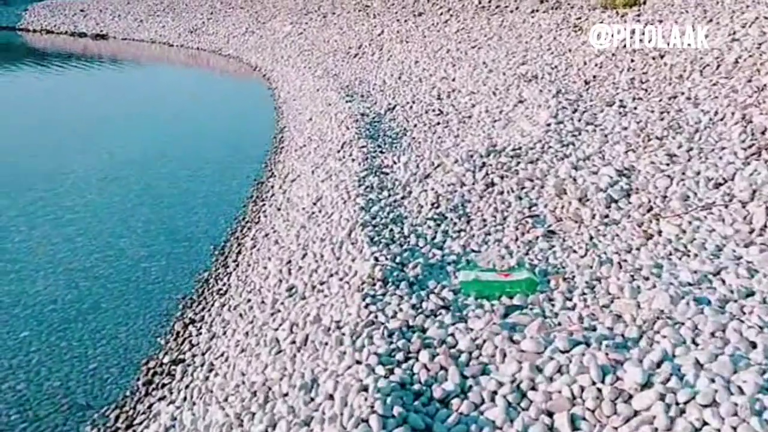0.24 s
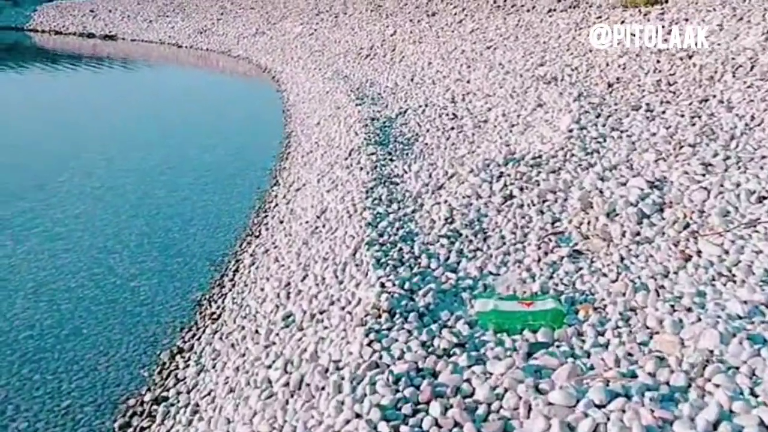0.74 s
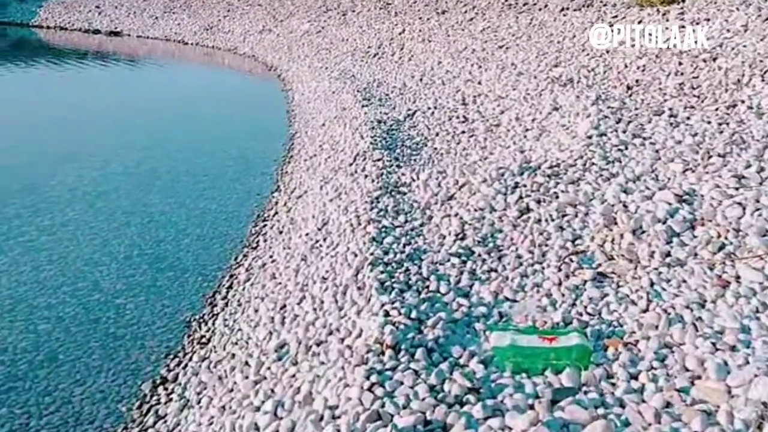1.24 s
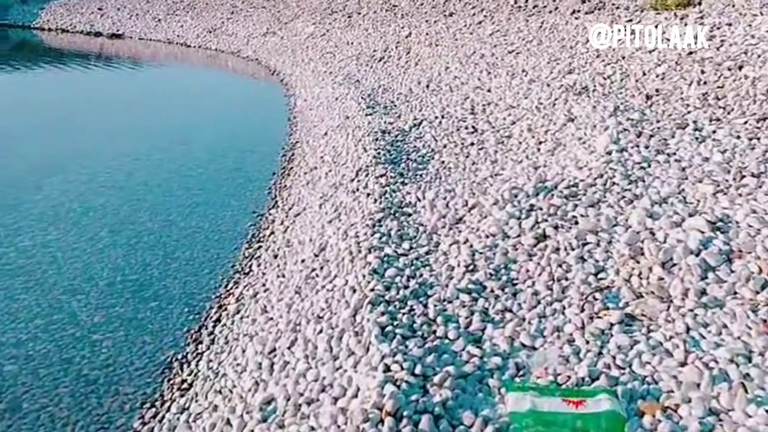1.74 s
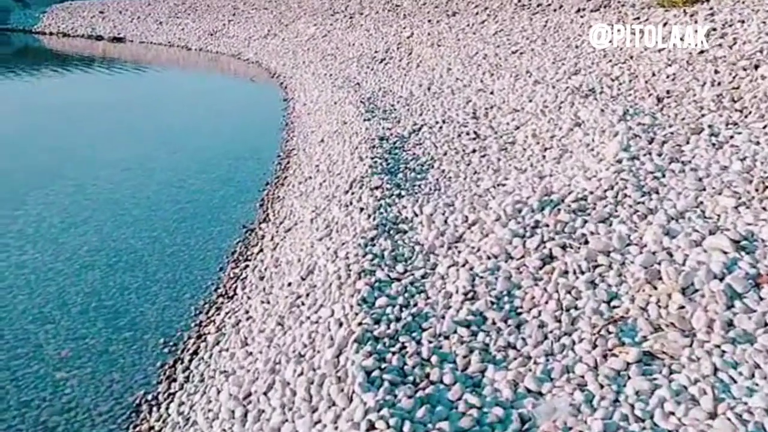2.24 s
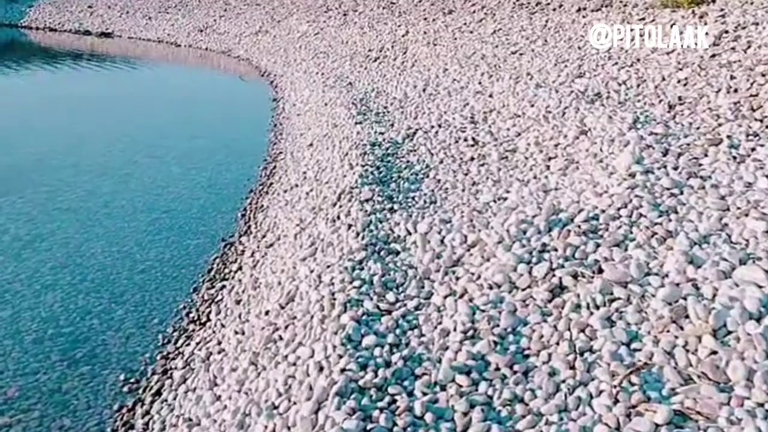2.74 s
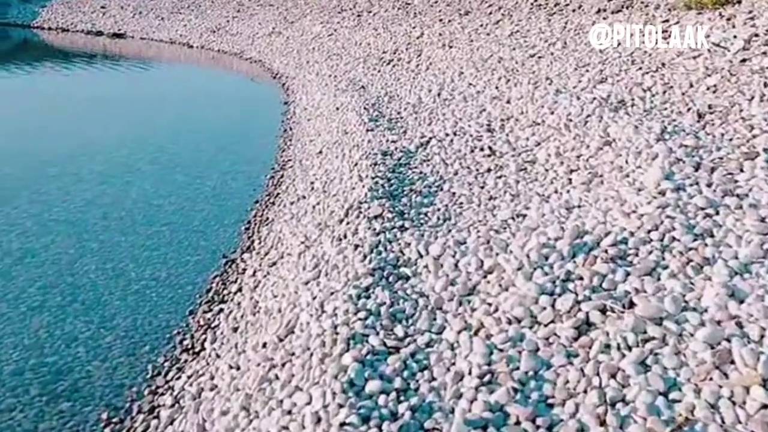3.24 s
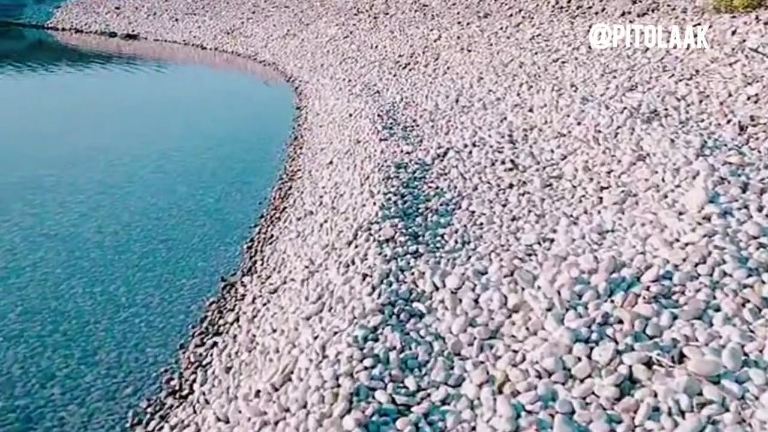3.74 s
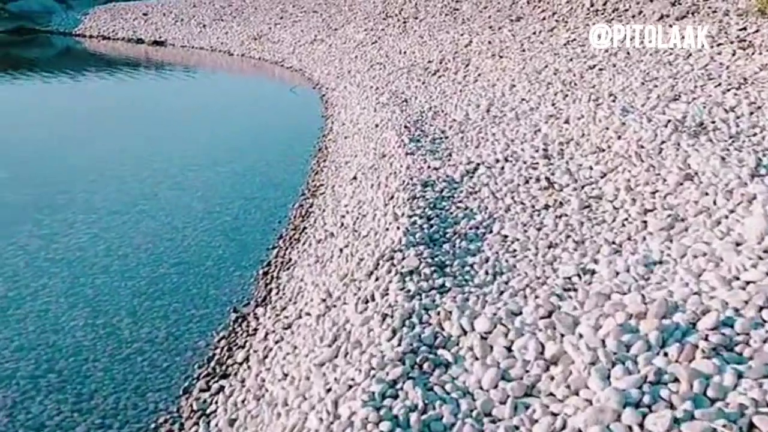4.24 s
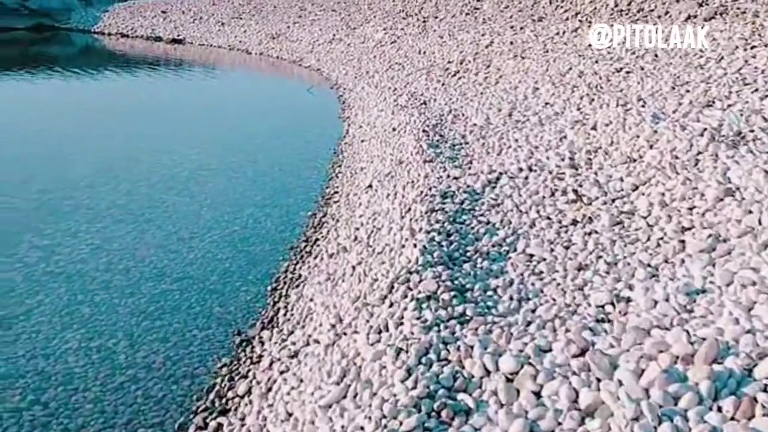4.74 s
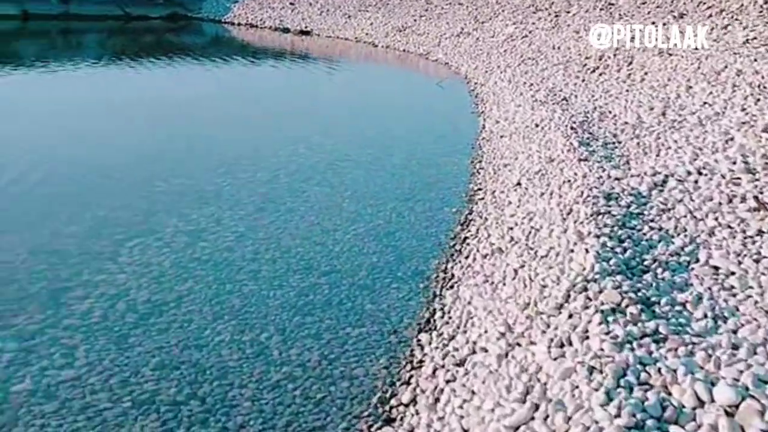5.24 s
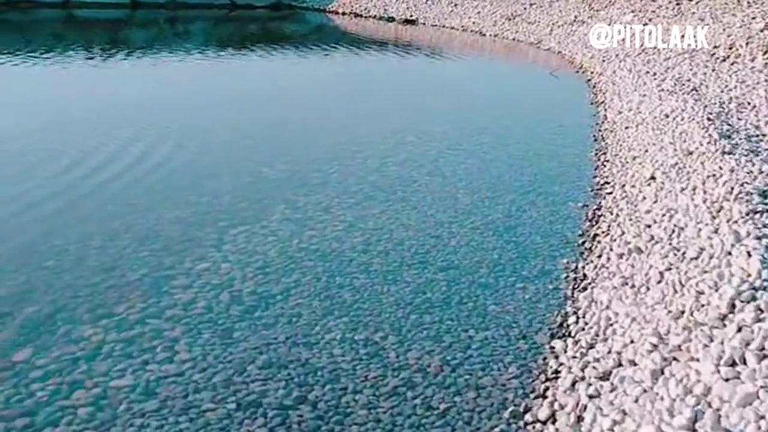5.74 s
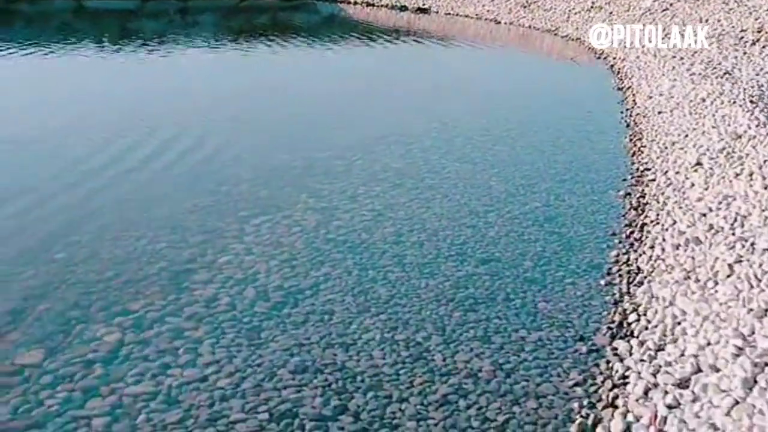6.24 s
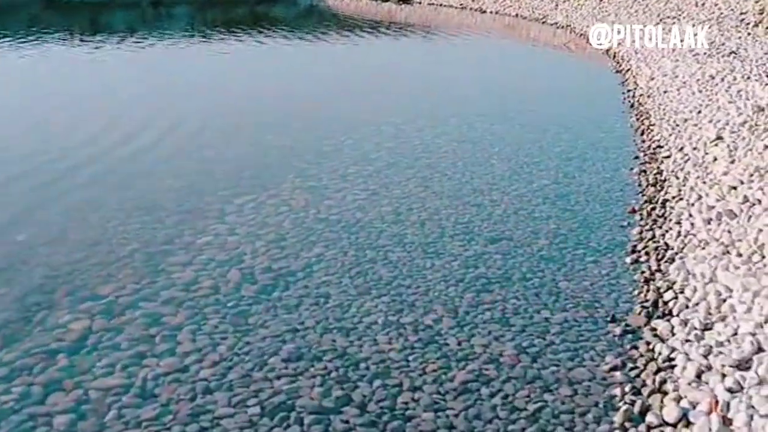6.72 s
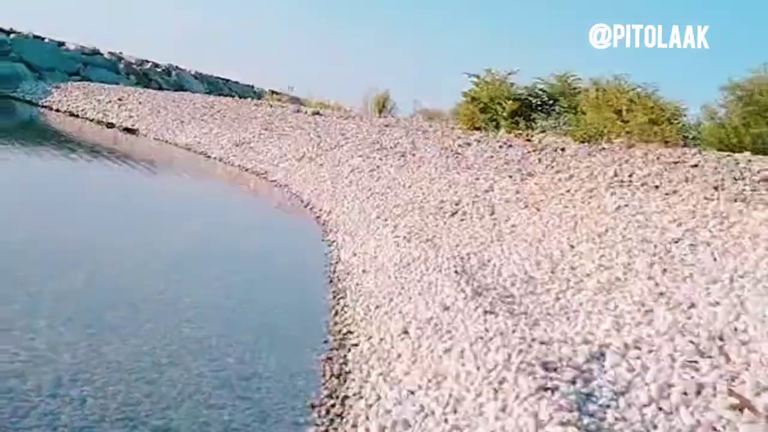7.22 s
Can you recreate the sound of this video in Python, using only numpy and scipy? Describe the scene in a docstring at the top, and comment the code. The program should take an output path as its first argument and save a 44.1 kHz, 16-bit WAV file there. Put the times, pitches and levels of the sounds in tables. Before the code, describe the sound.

Steps press into a deep bed of smooth stones on an open lake shore, heard near the walker's feet. Each brings a low grind, granular crunch and trickling pebbles, with sudden slips and hard single clacks. Dull knocks and brief squeaks appear occasionally. Behind are quiet air, a soft uneven rumble, thin hiss and a short distant bird trill; the final seconds are the clinkiest.

```python
"""A foot crunches into loose rounded pebbles on a lake shore, and a walk along the bed follows.
Steps and slides are showers of random stone contacts over rubbing noise; single pebbles clack as short
coloured rings, and damped sines knock. Cloth swishes as shaped noise; soles squeak as gliding tones.
Behind lie quiet air, a soft low rumble and a thin high hiss, all coloured noise, and a far bird whose
fast trill is a row of tiny falling whistles."""
import sys
import numpy as np
from scipy import signal
from scipy.fft import rfft, irfft, next_fast_len
from scipy.io import wavfile
from scipy.ndimage import uniform_filter1d, minimum_filter1d, map_coordinates

SR = 44100
rng = np.random.default_rng(int(sys.argv[2]) if len(sys.argv) > 2 else 0)


def wav_record(signal):
    """Record a signal, one row per channel, as 16-bit PCM in the file named by sys.argv[1]."""
    frames = np.transpose(np.atleast_2d(signal))
    bounded = np.clip(frames, -1, 1)
    # unit amplitude maps onto the largest positive 16-bit level
    quanta = np.round(bounded * 32767).astype(np.int16)
    wavfile.write(sys.argv[1], SR, quanta)


N = 329868

# Presses of a foot on the bed; a rise or fade time is the time for 20 dB, levels precede the layer gains:
# (full weight [s], rise [s], hold [s], fade [s], deep grinding [dB], crunch [dB], bright chinking [dB],
#  settling relative to the press [dB])
FOOT_PRESSES = [(0.0, .05, 0.071, 0.088, -41, -35, -44, -31),
                (0.288, 0.066, 0.1, .1, -47.5, -44.5, -58, -17),
                (0.572, 0.1, 0.11, .06, -37.5, -31.5, -41.5, -9.5),
                (1.246, 0.092, 0.13, 0.05, -33.5, -27, -36, -15),
                (1.485, 0.19, 0.047, 0.39, -43, -40.5, -56, -7), (1.885, 0.1, .12, .18, -29, -25, -34, -14),
                (2.486, 0.13, 0.15, .13, -31, -26, -36, -13),
                (2.925, 0.12, 0.083, .04, -39, -38.5, -48, -3),
                (3.235, 0.05, 0.027, 0.24, -30.5, -25.5, -32.5, -9),
                (3.743, 0.046, .22, 0.088, -40, -29.5, -32.5, -18.5),
                (4.364, 0.049, 0.15, 0.16, -37, -26, -27, -19.5),
                (5.203, 0.15, 0.21, 0.089, -34, -31, -35, -11),
                (5.395, 0.05, 0.071, 0.17, -31.5, -23.5, -23.5, -19),
                (5.69, 0.1, 0.18, 0.25, -42.5, -34, -34.5, -18),
                (6.037, 0.16, .16, .04, -45.5, -40, -46.5, -13),
                (6.387, 0.075, 0.23, 0.2, -41.5, -29, -27, -20),
                (6.8, 0.028, .18, 0.16, -47.5, -29, -35.5, -9.5),
                (7.328, 0.44, 0.17, .1, -51, -47.5, -59, -16)]
# Stones giving way suddenly under the sole, levels before the layer gains:
# (time [s], hold [s], deep grinding [dB], crunch [dB], bright chinking [dB])
STONE_SLIDES = [(0.688, 0.011, -30.5, -21, -31.5), (1.24, .025, -48, -29.5, -40),
                (1.695, 0.019, -46.5, -46, -52), (2.097, 0.026, -37, -29, -50),
                (2.55, 0.05, -38, -17.5, -28), (2.686, 0.011, -40.5, -25.5, -28),
                (2.836, 0.015, -51.5, -39, -43), (2.975, 0.024, -36, -26.5, -31),
                (3.328, 0.017, -32.5, -29.5, -29.5), (3.813, 0.059, -39.5, -32, -27),
                (5.115, 0.0099, -45, -27.5, -35), (5.708, 0.012, -37, -23, -22.5),
                (5.841, .015, -35.5, -25, -21), (6.065, 0.0043, -58, -27, -24),
                (6.195, 0.0081, -48, -36, -49), (6.371, 0.037, -38.5, -22, -17),
                (6.512, 0.021, -43, -22.5, -26), (6.671, 0.042, -55, -29, -30.5),
                (6.809, 0.03, -43, -29, -20)]
# Single pebbles striking each other; level over 5 ms before a common gain, bright edge relative to body:
# (time [s], level [dB], brightness [dB])
PEBBLE_CLACKS = [(0.0026, -21, 7), (0.035, -28, 17), (0.074, -30.5, -14), (0.396, -36.5, -27),
                 (0.5512, -21.5, 7), (0.678, -17, -6), (0.8195, -34.5, -22), (0.867, -39, -10),
                 (1.039, -39.5, -3), (1.2009, -23.5, -5), (1.2526, -16, -1), (1.3301, -19, 0),
                 (1.3568, -17.5, -6), (1.3878, -16, -11), (1.504, -24.5, -5), (1.9833, -15.5, -0.5),
                 (1.999, -15.5, -16), (2.138, -30.5, 11), (2.17, -33.5, -23), (2.2694, -32, -26),
                 (2.5544, -6, -8.5), (2.57, -16, 10), (2.5999, -14.5, -8), (2.6755, -22, 8.5),
                 (2.7013, -17, 9), (2.8163, -28.5, -13), (3.0023, -21.5, 4), (3.481, -33, -21.5),
                 (3.512, -32.5, -15), (3.5768, -31.5, -22.5), (3.719, -17.5, -0.5), (3.766, -17.5, 1),
                 (3.7943, -18.5, 5), (3.821, -13, 10), (3.8287, -11, 2), (3.8522, -16, 5),
                 (3.9892, -23, 2.5), (4.062, -34.5, -18), (4.3619, -20.5, -7), (4.4002, -18, -4),
                 (4.4394, -6.5, 9), (4.4924, -15, 13), (4.6222, -28, -20), (4.715, -25.5, -10),
                 (4.789, -28, -8.5), (4.9839, -28.5, -19), (5.0143, -24.5, -2.5), (5.069, -25.5, 1),
                 (5.087, -25, -5), (5.117, -16.5, 0.5), (5.348, -21.5, 13), (5.3807, -11.5, 5),
                 (5.4164, -17, -6), (5.4322, -13, 9), (5.454, -6, 17), (5.484, -18, 12), (5.539, -12.5, 25),
                 (5.559, -16, 8.5), (5.6125, -25, 4), (5.6324, -24.5, -7), (5.6685, -13, 11),
                 (5.688, -14.5, 11), (5.7098, -11.5, 5), (5.7284, -6, 16), (5.795, -22, 2),
                 (5.846, -15, -2), (5.8712, -19, 0), (5.8949, -13, 3.5), (5.927, -26, 2), (5.9456, -21, 2),
                 (6, -24, 7), (6.0515, -13.5, 3.5), (6.0944, -13, 11), (6.126, -25.5, 10), (6.1398, -29, 1),
                 (6.1737, -36, 2), (6.1897, -16, -5), (6.202, -14.5, 1), (6.2083, -19.5, 4),
                 (6.2819, -29.5, 3), (6.2972, -20.5, -5), (6.3708, -16, -7), (6.412, -11, 7),
                 (6.495, -15, 4), (6.5195, -4, 6.5), (6.532, -12, 22), (6.561, -18, 17), (6.604, -21.5, -7),
                 (6.7227, -14.5, 3), (6.76, -14.5, 0), (6.7996, -8.5, -1), (6.8076, -9, 12),
                 (6.9432, -12.5, 3.5), (6.9696, -16.5, -6), (6.993, -15, -3.5), (7.0787, -26.5, -16),
                 (7.1075, -22.5, -8.5), (7.147, -24.5, -1.5), (7.2112, -22.5, -11), (7.3562, -32, -8.5)]
# Dull knocks of a heel or a big stone settling:
# (time [s], level [dB], pitch [Hz], 60 dB decay [s])
DULL_KNOCKS = [(2.912, -25, 520, 0.046), (3.444, -33, 113, .12), (3.49, -22, 537, 0.037),
               (3.714, -22.5, 500, 0.044), (6.794, -14.5, 180, 0.026), (6.797, -27, 90, 0.064)]
# Clothes brushing as a leg swings through; the length is the full width at 1/e:
# (middle [s], level [dB], length [s])
CLOTH_SWISHES = [(1.785, -44, .014), (1.838, -42, 0.038), (1.92, -42, 0.092), (2.063, -46, .012),
                 (2.952, -41, 0.081), (3.22, -47, 0.067), (4.5, -36, 0.082), (5.363, -35, 0.21),
                 (6.444, -59, 0.058), (6.557, -41, 0.25), (6.826, -38, 0.04)]
# Squeaks of a sole slipping on smooth stone:
# (time [s], peak level [dB], length [s], first pitch [Hz], last pitch [Hz])
SOLE_SQUEAKS = [(2.915, -33, 0.035, 1440, 1030), (2.939, -31, 0.038, 1435, 1135),
                (6.514, -17.5, 0.019, 1390, 1310), (6.551, -20, 0.0083, 1380, 1390),
                (6.555, -26, 0.029, 1515, 1340)]
# Soft low rumble, uneven in level, before RUMBLE_GAIN_DB: (time [s], level [dB])
RUMBLE_LEVEL = [(0.0, -56), (0.16, -61.5), (2.52, -52), (2.81, -62), (3.02, -45.5), (3.08, -60),
                (3.33, -49), (4.23, -64), (4.5, -55), (4.89, -66), (5.23, -47), (5.77, -63), (6.37, -50.5),
                (7.44, -56.5), (7.48, -62)]
# Thin high hiss: (time [s], level [dB])
HISS_LEVEL = [(0, -64), (.9, -60.5), (1.2, -54), (2.3, -52.5), (3.6, -56), (4.1, -66), (7.48, -80)]
# The bird's trill, mean peak level of its notes: (time [s], level [dB])
TRILL_LEVEL = [(3.439, -58), (3.56, -54), (3.61, -40.5), (3.72, -39), (4.05, -46), (4.2, -46), (4.36, -45)]

# Relative spectra of the grinding, crunch, chinking, grit, clack body, air, low rumble and hiss:
# (frequency [Hz], density [dB per Hz])
GRIND_SPECTRUM = [(30, -57), (70, -40), (140, -20.5), (200, -3.5), (310, -0.5), (430, -4.5), (700, -7),
                  (1100, -6), (2500, -101)]
CRUNCH_SPECTRUM = [(40, -72), (300, -51), (600, -6), (850, -10), (1600, 2), (2400, 1), (3100, 0.5),
                   (3900, -5.5), (4800, -12), (8000, -61)]
CHINK_SPECTRUM = [(40, -70), (2500, -27.5), (3600, -4), (4300, -2), (5000, -1.5), (6100, 2), (7800, -4.5),
                  (9300, -14), (10200, -23.5), (15500, -38)]
GRIT_SPECTRUM = [(4000, -20), (8000, 5), (10000, -5.5), (15500, -12.5)]
BODY_SPECTRUM = [(25, -62), (100, -22.5), (250, -7), (500, -8.5), (900, -6.5), (1600, -5), (3000, 4.5),
                 (3900, -4), (4800, -15.5), (8000, -66)]
AIR_SPECTRUM = [(25, -25), (70, -3), (130, -14), (300, 5), (1000, -1.5), (2000, -10), (4000, -48),
                (8000, -25), (16000, -31)]
RUMBLE_SPECTRUM = [(20, -26), (45, -20), (90, 2), (130, 1), (220, -7.5), (500, -38)]
HISS_SPECTRUM = [(2500, -20), (4000, -4.5), (4700, -1), (5300, -2.5), (6000, -0.5), (6800, -6.5), (7800, 1),
                 (9200, -7.5), (10500, -19), (15500, -18)]

# Ring of the gaps between the stones: (frequency [Hz], 60 dB decay [s])
GAP_DECAY = [(250, 0.027), (1000, 0.025), (3000, 0.042), (6000, 0.014), (12000, 0.021)]
# Ring of pebbles lying on top: (frequency [Hz], 60 dB decay [s])
SURFACE_DECAY = [(250, 0.044), (1000, 0.056), (3000, 0.032), (6000, 0.025), (12000, 0.026)]
# Scatter from the beach around: (frequency [Hz], 60 dB decay [s])
BEACH_DECAY = [(200, 0.26), (2000, 0.099), (8000, 0.063)]
# The low part of a contact builds up later than its edge: (frequency [Hz], lag [s])
CONTACT_LAG = [(1200, 0.001091), (5000, 0.000733), (9000, 0.00034)]

SLIDE_RISE_S, SLIDE_FADE_S = 0.025, 0.038  # time for 20 dB
SETTLE_DB_PER_S = 41.5
THUD_DB = -25.5  # relative to the grinding
RUMBLE_GAIN_DB = 2
CEILING, TOP_HZ = 0.95, 15700


def footsteps(count=90):
    """Granular friction: one set of contacts grinds, crunches and chinks, with grit and a ground thud."""
    grind_db, crunch_db, chink_db = bed_levels()
    load = np.interp(grind_db, [-52, -30], [0, 1])
    hits = slips(load, count=count)
    rubbing_db = 4 * (load - 1)  # continuous rubbing strengthens with the load

    crunch = amp(0.03) * shower(crunch_db, CRUNCH_SPECTRUM, hits, count)
    crunch += amp(crunch_db + rubbing_db - 5.5) * noise(CRUNCH_SPECTRUM)
    chink = amp(-0.4) * shower(chink_db, CHINK_SPECTRUM, hits, count)
    chink += amp(chink_db + rubbing_db - 10.5) * noise(CHINK_SPECTRUM)
    grind = amp(-2.5) * shower(grind_db, GRIND_SPECTRUM, hits, count)
    grind += amp(grind_db - 2.5) * noise(GRIND_SPECTRUM)

    grit = amp(grind_db + rubbing_db - 19.5) * noise(GRIT_SPECTRUM)
    thud = amp(grind_db + THUD_DB) * noise(RUMBLE_SPECTRUM)  # the walker's weight in the ground
    return crunch + chink + grind + grit + thud


def bed_levels(size=32):
    """Power addition of independent sources: steps, settling and slides give three levels in dB."""
    t = np.arange(0, N, size) / SR
    pushes = []
    for s, hold, *levels_db in STONE_SLIDES:
        pushes.append((press(t - s, SLIDE_RISE_S, hold, SLIDE_FADE_S), levels_db))
    for s, rise, hold, fade, *levels_db, settle_db in FOOT_PRESSES:
        pressing = press(t - s, rise, hold, fade)
        settling = settle_db + press(t - s, rise, hold, 20 / SETTLE_DB_PER_S)
        pushes.append((np.maximum(pressing, settling), levels_db))
    power = sum(amp(np.add.outer(levels_db, shape)) ** 2 for shape, levels_db in pushes)
    return curves(np.column_stack([t, *(10 * np.log10(power + 1e-12))]))


def press(t, rise_s, hold_s, fade_s):
    """Exponential growth and decay: a push rises until t = 0, holds and fades, straight lines in dB."""
    return -20 * (np.maximum(-t, 0) / rise_s + np.maximum(t - hold_s, 0) / fade_s)


def slips(load, count, idle_rate=300, loaded_rate=850, spread_db=9.0):
    """Random arrivals: contacts (rates per second) crowd with load at an expected mean power near 1."""
    rate = idle_rate * (loaded_rate / idle_rate) ** load
    chance = rng.random(N)
    strength = rng.standard_normal(N)
    stone = rng.integers(count, size=N)
    at = np.flatnonzero(chance < rate / SR)
    size = unit(amp(spread_db * np.minimum(strength[at], 1.25)))
    return at, size * np.sqrt(SR / rate[at]), stone[at]


def shower(level_db, spectrum, hits, count, own_db=3):
    """Superposition of impulse responses: each (sample, size, stone) hit adds its stone's own ring."""
    at, size, stone = hits
    share = unit(amp(own_db * rng.uniform(-1.56, 1.7, N)))[at]  # every blow lands at another angle
    rings = colour(contacts(GAP_DECAY, count=count), spectrum, ripple_db=5.0, count=28)
    gains = size * share * amp(level_db[at])
    out = np.zeros(N)
    for s, gain, k in zip(at / SR, gains, stone):
        add(out, s, gain * rings[k])
    return out


def contacts(decays, count, snap=0.37, snap_s=0.00076, rise_s=0.00031):
    """Impact excitation: stone on stone snaps hard, then rings, differently for each contact."""
    ring = dying(decays, count=count, size=2048)
    t = np.arange(ring.shape[1]) / SR
    onset = 1 - np.exp(-(t / rise_s) ** 2)
    accent = 1 + snap * np.exp(-(t / (2 * snap_s)) ** 2)
    return ring * onset * accent


def dying(decays, count, size):
    """Frequency-dependent damping: rows of dense ringing lose each band at its own rate."""
    hz, t, bands = signal.stft(rng.standard_normal((count, size)), SR, nperseg=64)
    damped = bands * amp(-60 * t / along(decays, hz)[:, None])
    return signal.istft(damped, SR, nperseg=64)[1][:, :size]


def colour(x, spectrum, ripple_db=3.5, count=26, size=2048):
    """Minimum-phase resonance plus group delay: each row gets its stone's colour and an energy of 1."""
    hz = np.fft.rfftfreq(size, 1 / SR)
    place = np.sqrt(hz / hz[-1]) * (count - 1)
    knots_by_row = rng.standard_normal((len(x), count))
    ripple = np.array([map_coordinates(knots, [place]) for knots in knots_by_row])
    # folding the cepstrum onto positive time makes the response causal
    cepstrum = irfft(np.log(amp(along(spectrum, hz) + ripple_db * ripple)))
    cepstrum[:, 1:size // 2] *= 2
    cepstrum[:, size // 2 + 1:] = 0
    lag_phase = 2 * np.pi * np.cumsum(along(CONTACT_LAG, hz)) * hz[1]
    response = irfft(np.exp(rfft(cepstrum) - 1j * lag_phase))[:, :size // 2]
    y = signal.fftconvolve(x, response, axes=1)[:, :x.shape[1]]
    return y / np.linalg.norm(y, axis=1, keepdims=True)


def clacks():
    """Impact of free bodies: loose pebbles knock together, small ones with a brighter edge."""
    out = np.zeros(N)
    ring = contacts(SURFACE_DECAY, count=len(PEBBLE_CLACKS), snap=0.54, snap_s=0.0012, rise_s=0.00083)
    bodies = colour(ring, BODY_SPECTRUM, ripple_db=0.0, count=36)
    edges = colour(ring, CHINK_SPECTRUM, ripple_db=2.0, count=36)
    for (s, db, bright_db), body, edge in zip(PEBBLE_CLACKS, bodies, edges):
        clack = body + amp(bright_db) * edge
        # SR / 200 samples last 5 ms
        add(out, s, amp(db) * np.sqrt(SR / 200) * clack / np.linalg.norm(clack))
    return amp(0.22) * out


def knocks():
    """Damped oscillation: heavy blows low in the bed, where the air follows the speed of the stone."""
    out = np.zeros(N)
    t = np.arange(SR // 5) / SR
    for s, db, hz, t60 in DULL_KNOCKS:
        envelope = amp(db - 60 * t / t60) * (1 - np.exp(-t / 0.0008))
        motion = envelope * np.sin(2 * np.pi * hz * t)
        add(out, s, np.gradient(motion) * SR / (2 * np.pi * hz))
    return out


def walker():
    """Friction of cloth and sole: brushing gives swells of noise, slipping gives gliding squeaks."""
    t = np.arange(N) / SR
    swell = np.zeros(N)
    for s, db, length in CLOTH_SWISHES:
        swell += amp(db) * np.exp(-(2 * (t - s) / length) ** 2)
    out = noise(GRIT_SPECTRUM) * swell
    for s, db, length, first_hz, last_hz in SOLE_SQUEAKS:
        add(out, s, amp(db) * whistle(length, first_hz, last_hz))
    return out


def bird(notes_per_s=64, note_s=0.017, middle_hz=4860, fall_hz=600):
    """Frequency modulation: a fast trill of falling whistles, uneven in strength and pitch."""
    out = np.zeros(N)
    times, levels = np.transpose(TRILL_LEVEL)
    for s in np.arange(times[0], times[-1], 1 / notes_per_s):
        effort, drift = rng.standard_normal(2)
        hz = middle_hz + 35 * drift
        fall = fall_hz * (1 + 0.25 * effort)  # stronger notes sweep wider
        db = np.interp(s, times, levels) + 1.8 * effort
        add(out, s, amp(db) * whistle(note_s, hz + fall / 2, hz - fall / 2))
    return out


def whistle(length_s, first_hz, last_hz):
    """Phase as the integral of frequency: a short gliding tone swells and fades."""
    u = np.linspace(0, 1, int(length_s * SR))
    phase = 2 * np.pi * np.cumsum(first_hz + (last_hz - first_hz) * u) / SR
    return np.sin(np.pi * u) ** 2 * np.sin(phase)


def outdoors():
    """Broadband noise: steady quiet air, uneven low rumble and high hiss, each with its own spectrum."""
    air = amp(-57) * noise(AIR_SPECTRUM)
    rumble = amp(curves(RUMBLE_LEVEL)[0] + RUMBLE_GAIN_DB) * noise(RUMBLE_SPECTRUM)
    hiss = amp(curves(HISS_LEVEL)[0]) * noise(HISS_SPECTRUM)
    return air + rumble + hiss


def noise(spectrum):
    """Spectral shaping: white noise is coloured and set to rms 1."""
    m = next_fast_len(N)
    white = rfft(rng.standard_normal(m))
    return unit(irfft(white * amp(along(spectrum, np.fft.rfftfreq(m, 1 / SR))), m)[:N])


def amp(db):
    """Decibel law: level to amplitude."""
    return 10 ** (np.asarray(db) / 20)


def unit(x):
    """Power normalisation: scale to rms 1."""
    return x / np.sqrt(np.mean(x ** 2) + 1e-20)


def along(points, hz):
    """Logarithmic frequency scale: interpolate (frequency [Hz], value) points."""
    f, v = np.transpose(points)
    return np.interp(np.log(hz + 1), np.log(f + 1), v)


def curves(rows):
    """Linear interpolation in time: one value per sample for each column after the time."""
    s, *cols = np.transpose(rows)
    return [np.interp(np.arange(N) / SR, s, c) for c in cols]


def add(track, s, sound):
    """Linear superposition: mix a sound into the track at time s."""
    start = max(round(s * SR), 0)
    part = track[start:start + len(sound)]
    part += sound[:len(part)]


def scene():
    """Direct and scattered sound: the walk gains a faint beach tail, then air and bird are added."""
    near = footsteps() + clacks() + knocks() + walker()
    tail = dying(BEACH_DECAY, count=1, size=8192)[0]
    scatter = signal.fftconvolve(near, tail / np.linalg.norm(tail))[:N]
    return (near + amp(-16.5) * scatter + outdoors() + bird())[None]


def record(dry, size=45):
    """Peak limiting and band limiting: smoothed gain holds the peaks, then all above TOP_HZ is removed."""
    needed = np.minimum(1, CEILING / (np.abs(dry) + 1e-9))
    held = dry * uniform_filter1d(minimum_filter1d(needed, size), size)
    m = next_fast_len(N + SR // 2)
    passband = np.fft.rfftfreq(m, 1 / SR) < TOP_HZ
    return irfft(rfft(held, m) * passband, m)[:, :N]


dry = scene()
out = record(dry)
wav_record(out)
```